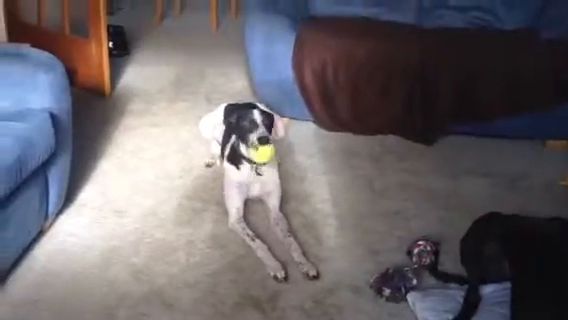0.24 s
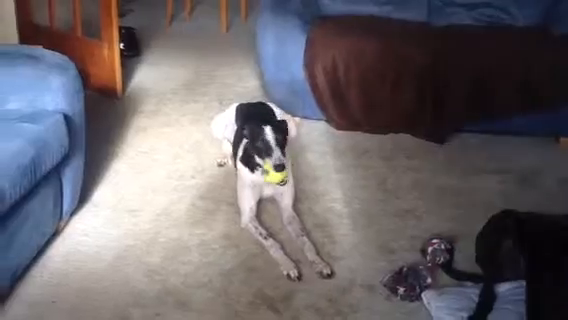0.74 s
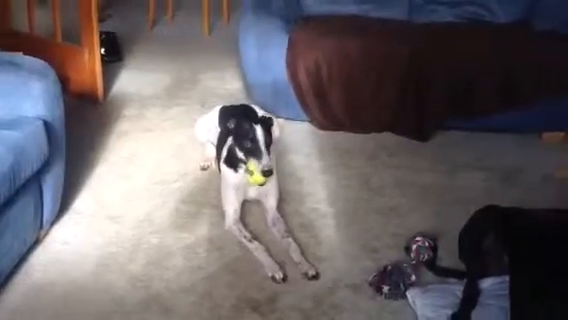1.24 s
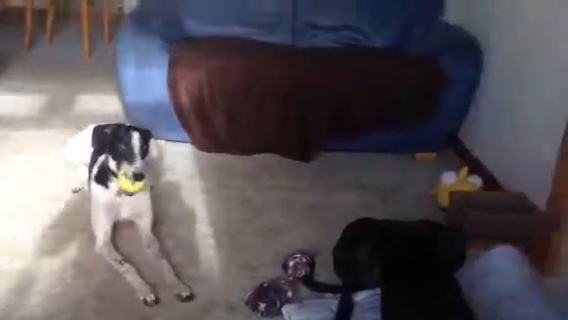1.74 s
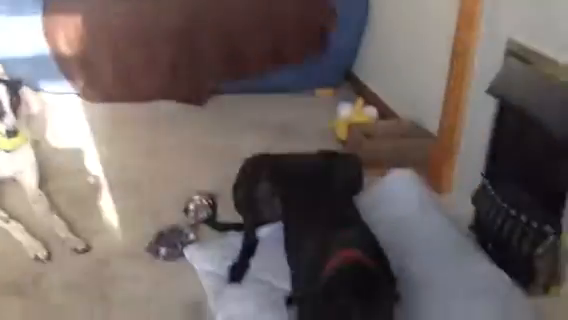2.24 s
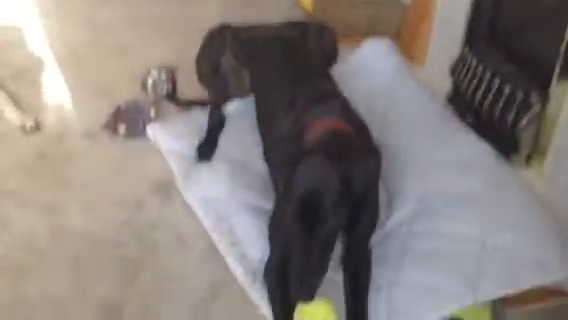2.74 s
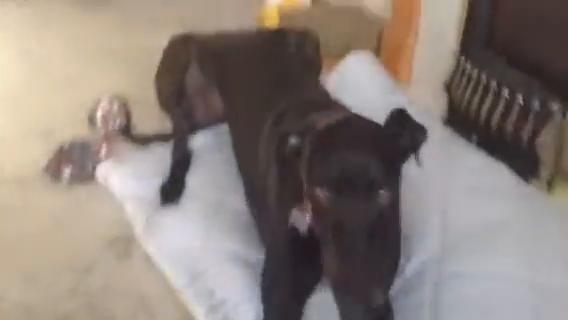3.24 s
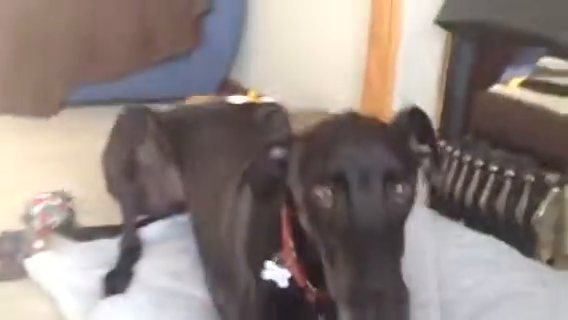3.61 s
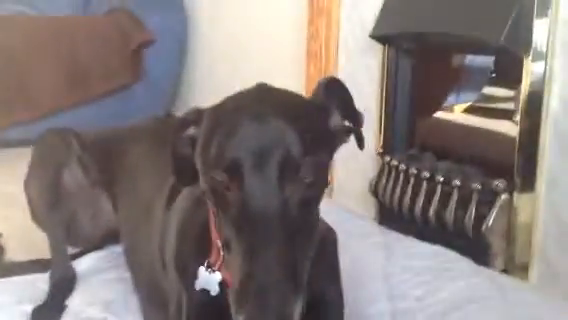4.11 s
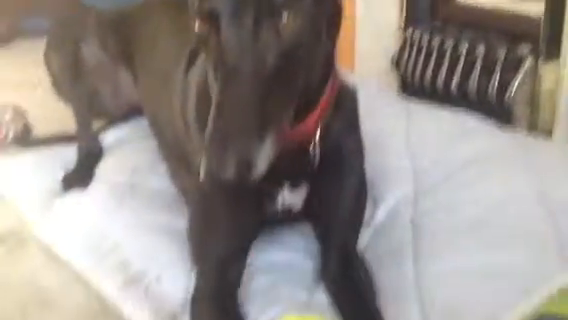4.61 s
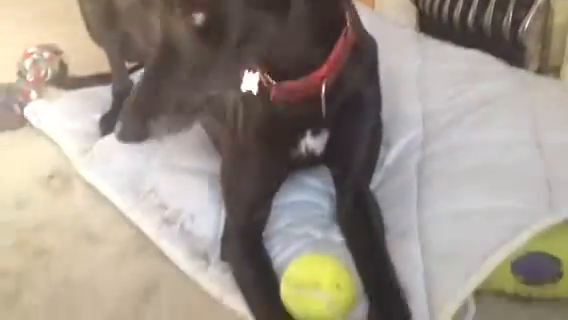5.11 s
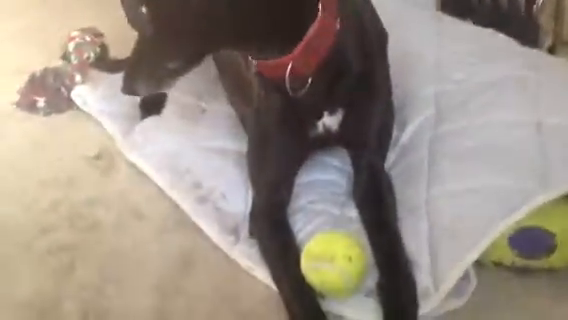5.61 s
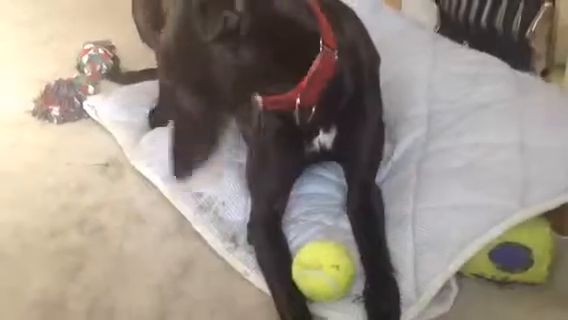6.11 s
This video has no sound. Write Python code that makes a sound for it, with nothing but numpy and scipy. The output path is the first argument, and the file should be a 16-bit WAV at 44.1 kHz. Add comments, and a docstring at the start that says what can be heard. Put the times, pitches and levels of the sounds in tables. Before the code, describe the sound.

A squeaky dog toy is heard a little way off with a short, soft indoor tail: a brief squeak, a strong bright one, a softer one, then after a gap a weak one, a longer one and a sharp final one. Much nearer, a hard bump lands before the middle, and a cluster of knocks and scuffs follows late, with small ticks and rustling over low hush. The microphone is small and thin in bass.

```python
"""A carpeted living room: a dog chews a squeaky ball. Its reed whistles as the jaws squeeze air out and again,
lower and sinking, as the ball refills: a stack of overtones weighed by pipe and mouth, plus air noise.
Short hisses lead into the squeezes, and a dense noise tail gives the room. Close to the microphone: damped
pulses for dry knocks, noise bursts for ticks and scuffs, grainy noise for cloth, one puff with a thin whistle.
Steady coloured noise is the soft hush behind."""
import sys
import numpy as np
from scipy import signal
from scipy.fft import rfft, irfft
from scipy.io import wavfile

SR = 44100
rng = np.random.default_rng(int(sys.argv[2]) if len(sys.argv) > 2 else 0)


def magnitude_from_level(level_db):
    """Linear magnitude for a level in decibels (20 dB per decade)."""
    exponent = np.asarray(level_db, float) / 20
    return 10 ** exponent


def pcm_store(signal):
    """Save signal as 16-bit PCM."""
    levels = np.round(np.clip(np.atleast_2d(signal), -1, 1) * 32767)
    wavfile.write(sys.argv[1], SR, levels.astype(np.int16).T)


N = 280035

# reed notes as the jaws squeeze air out, one list each: time_s, pitch_hz, level_db (before the mix)
SQUEEZES = [
    [(.393, 1532, -30.5), (.406, 1497, -26.5), (.418, 1467, -23), (.436, 1450, -27.5)],
    [(.995, 1456, -30.5), (1.02, 1472, -23.5), (1.052, 1574, -17), (1.057, 1697, -16.5), (1.08, 1727, -20),
     (1.1, 1799, -25.5), (1.134, 1774, -19)],
    [(1.944, 1564, -35), (1.951, 1560, -30.5), (1.97, 1786, -26.5), (1.99, 1784, -25.5),
     (2.005, 1818, -28.5), (2.03, 1834, -28.5), (2.052, 1657, -25)],
    [(3.518, 1573, -34), (3.535, 1610, -31), (3.546, 1647, -33.5), (3.553, 1491, -28), (3.595, 1467, -33.5)],
    [(4.754, 1476, -29), (4.788, 1488, -31), (4.794, 1633, -29), (4.81, 1754, -24.5), (4.83, 1809, -22.5),
     (4.89, 1757, -24.5), (4.937, 1827, -23)],
    [(6.19, 1563, -28), (6.205, 1553, -30.5), (6.24, 1791, -30.5), (6.255, 1811, -22.5),
     (6.268, 1767, -27.5), (6.274, 1886, -19.5), (6.288, 1891, -15.5), (6.294, 2156, -24),
     (6.314, 2096, -20.5), (6.334, 2100, -26)],
]
# reed notes as the ball draws air back in, one list each: time_s, pitch_hz, level_db (before the mix)
REFILLS = [
    [(-.14, 1600, -30), (-.04, 1340, -38)],
    [(.464, 1450, -33), (.484, 1456, -29.5), (.497, 1522, -25), (.51, 1479, -28), (.55, 1405, -39.5),
     (.575, 1289, -39)],
    [(1.145, 1475, -30.5), (1.16, 1567, -31.5), (1.19, 1653, -27.5), (1.205, 1647, -23),
     (1.24, 1635, -22.5), (1.275, 1545, -26.5), (1.34, 1443, -27.5), (1.365, 1365, -37), (1.39, 1350, -48)],
    [(2.066, 1493, -26), (2.078, 1646, -33), (2.09, 1671, -29.5), (2.12, 1651, -31), (2.14, 1565, -31),
     (2.2, 1418, -34.5), (2.245, 1350, -56)],
    [(3.608, 1496, -31), (3.617, 1624, -26.5), (3.628, 1607, -39), (3.645, 1542, -35), (3.665, 1476, -29.5),
     (3.69, 1446, -38), (3.72, 1367, -46.5), (3.74, 1387, -42)],
    [(4.958, 1515, -20), (4.99, 1595, -33.5), (5.015, 1587, -24.5), (5.065, 1525, -30), (5.12, 1545, -28),
     (5.132, 1659, -31.5), (5.15, 1611, -27), (5.19, 1450, -33), (5.245, 1391, -42.5)],
    [(6.33, 1478, -28), (6.37, 1420, -34.5)],
]
# overtone tilt at 1550 Hz, one per note: tilt_db_per_octave
SQUEEZE_TILT_DB_PER_OCTAVE = [4.5, 2.5, 0.5, 1.5, 4.5, 5.5]
REFILL_TILT_DB_PER_OCTAVE = [-5, -1.5, -1.5, -5, -2.5, -4.5, -2.5]
# lift of a band of overtones by the mouth round the ball, one per note: lift_db
SQUEEZE_MOUTH_DB = [4.2, 5, 2.3, 4, 11, 3.1]
REFILL_MOUTH_DB = [12, 11.5, 5.5, 13.5, 8, 9, 0.5]
# how long the reed catches sharp, one per squeeze: catch_s
CATCH_S = [.011, 0, 0, .005, .008, .005]
# hiss reached as each squeeze catches, one per squeeze: level_db (before the mix)
LEAK_DB = [-56.5, -56.5, -63, -65.5, -63, -67.5]
# overtone gain of the squeaker's pipe and the ball: freq_hz, gain_db
PIPE = [(1300, -9.5), (2000, -20), (2700, 6), (3300, 4.5), (4000, 1), (5200, -4), (7000, -8), (9500, -11),
        (12500, -17), (15500, -29)]
# decay time of the room: freq_hz, t60_s
ROOM_T60 = [(1000, 0.38), (3000, 0.27), (7000, 0.22), (14000, 0.2)]
# dull knocks near the microphone: start_s, peak_db, pulse_hz
KNOCKS = [(0.242, -38.5, 221), (0.394, -35, 284), (0.489, -39, 253), (1.752, -39.5, 417),
          (1.829, -36, 1136), (2.258, -32, 360), (2.451, -31, 883), (2.487, -41, 180), (2.682, -9.5, 980),
          (2.725, -24.5, 540), (2.972, -34.5, 200), (3.923, -33.5, 227), (4.236, -33.5, 221),
          (4.645, -40.5, 328), (4.893, -45, 327), (4.941, -40, 187), (5.131, -22, 407), (5.202, -23, 1080),
          (5.211, -21, 1020), (5.233, -29, 292), (5.332, -22, 557), (5.403, -24.5, 473),
          (5.575, -42.5, 200), (5.667, -23, 420), (5.82, -36, 227), (5.878, -14, 800), (6.005, -20, 560),
          (6.212, -12.5, 864)]
# bursts of rough rubbing: start_s, length_s, level_db, low_hz, high_hz
SCUFFS = [(0.415, 0.022, -51, 200, 2000), (0.622, 0.061, -60.5, 2480, 5470),
          (2.464, 0.01, -49.5, 600, 5770), (2.498, 0.016, -52.5, 300, 2460),
          (2.681, 0.014, -32.5, 1190, 8660), (2.877, 0.058, -59, 500, 6810),
          (2.948, 0.11, -53.5, 150, 4400), (3.147, 0.031, -58.5, 1000, 6840),
          (3.922, 0.013, -46.5, 300, 9000), (4.22, 0.056, -53, 298, 1470),
          (4.237, 0.0079, -43.5, 298, 9120), (4.483, 0.047, -63, 2020, 8880),
          (5.125, 0.092, -41.5, 150, 1093), (5.202, 0.018, -31, 198, 2060), (5.244, 0.029, -55, 200, 1800),
          (5.674, 0.085, -59, 200, 1815), (6.017, 0.042, -60.5, 297.3, 2170)]
# thin ticks: start_s, peak_db, centre_hz
TICKS = [(1.834, -42, 1900), (2.4535, -30.5, 2050), (2.8866, -35.5, 2350), (2.9022, -44, 4950),
         (3.1586, -51, 3990), (3.924, -31, 1750), (4.0013, -37.5, 9490), (4.031, -43.5, 3580),
         (4.093, -41, 4450), (4.2162, -52, 4400), (4.237, -33.5, 1970), (4.4, -44.5, 2140),
         (4.4785, -45.5, 3040), (4.585, -43.5, 2120), (4.7094, -40.5, 1760), (5.4886, -43, 2030),
         (5.5327, -48.5, 4270)]
# cloth and handling rustle: time_s, level_db
RUSTLE = [(0.0, -63.5), (1.06, -64), (1.55, -61), (2.1, -59), (2.55, -60), (2.8, -55.5), (2.95, -49.5),
          (3.08, -57.5), (3.87, -60), (4.62, -68.5), (5.13, -70), (5.31, -58.5), (5.5, -66.5),
          (5.84, -66.5), (6.35, -74.5)]
# relative power density of the cloth: freq_hz, density_db
CLOTH = [(59, -50), (100, -6.5), (202, -1), (301, -8.5), (383, -3.5), (583, -10.5), (1220, -10),
         (3400, -20), (12000, -33), (15600, -74.5), (22000, -120)]
# relative power density of the hush: freq_hz, density_db
HUSH = [(24, -49), (40, -30.5), (64, -28.5), (162, -1.5), (333, 3.5), (535, -11), (1020, -8.5),
        (2060, -35.5), (2920, -14.5), (3560, -19), (4240, -17.5), (13000, -24), (15500, -24.5)]

LEAD_S = 0.25   # the ball already sounds before the start


def rms_one(x):
    """Scales to rms 1."""
    return x / np.sqrt(np.mean(x ** 2) + 1e-20)


def at_hz(points, hz):
    """Reads a curve over log frequency."""
    point_hz, value = np.transpose(points)
    return np.interp(np.log(hz), np.log(point_hz), value)


def band(x, low_hz, high_hz, order=2):
    """Band-pass."""
    edges_hz = [low_hz, min(high_hz, 0.45 * SR)]
    return signal.sosfilt(signal.butter(order, edges_hz, "band", fs=SR, output="sos"), x)


def lowpass(x, hz, order):
    """Low-pass."""
    return signal.sosfilt(signal.butter(order, hz, fs=SR, output="sos"), x)


def drift(rate_hz):
    """Random wander of rms 1: white noise through two equal one-pole low-passes."""
    r = np.exp(-2 * np.pi * rate_hz / SR)
    settled = signal.lfilter([1], [1, -2 * r, r * r], rng.standard_normal(N + SR))[SR:]
    return rms_one(settled)


def coloured(white, spectrum):
    """Shapes noise to a spectrum; rms 1."""
    hz = np.maximum(np.fft.rfftfreq(N, 1 / SR), 1)
    return rms_one(irfft(rfft(white) * magnitude_from_level(at_hz(spectrum, hz)), N))


def faint(level_db, low_hz, high_hz, count=7):
    """Small events at chance moments, up to 5 dB below level_db: start_s, peak_db, freq_hz."""
    u = rng.random((count, 3))
    freq_hz = low_hz * (high_hz / low_hz) ** u[:, 2]
    return list(zip(u[:, 0] * N / SR, level_db - 5 * u[:, 1], freq_hz))


def mouth(partial_hz, lift_db, squeezed):
    """Overtone gain in dB: the mouth lifts a band, lower as the jaws close; a refill also has a dip."""
    centre_hz = 7970 if squeezed else 12100
    gain_db = lift_db * np.exp(-(np.log2(partial_hz / centre_hz) / 0.9) ** 2)
    if not squeezed:
        gain_db -= 15 * np.exp(-(np.log2(partial_hz / 8100) / 0.23) ** 2)
    return gain_db


def reed():
    """The reed chops air into sharp puffs: overtones weighed by pipe and mouth, air noise on each puff."""
    attack_s, release_s = 0.007, 0.0038
    catch_rise, catch_fade_s, catch_dulls_db_per_octave = 0.13, 0.0026, 8.8
    # as the jaws stop, pitch, level and tilt fall away
    collapse_hz, collapse_s, collapse_db, collapse_dulls_db_per_octave = 1238, 0.015, 5.5, 5
    # weak flow makes the pitch waver more
    waver_ratio, weak_waver_ratio_per_db, weak_below_db = 0.003, 0.0036, -39.5
    # alternate puffs differ for a moment
    doubling_start_s, doubling_length_s, undertone_db, doubling_depth = 1.17, 0.11, -32, 0.14

    lead = int(LEAD_S * SR)
    out = np.zeros(N + lead + SR)
    waver, flutter, shading, tilt_wander = drift(110), drift(42), drift(20), drift(25)
    air = rms_one(band(rng.standard_normal(N), 2700, 22000))
    k = np.arange(1, 13)[:, None]   # partial numbers
    notes = SQUEEZES + REFILLS
    tilts = SQUEEZE_TILT_DB_PER_OCTAVE + REFILL_TILT_DB_PER_OCTAVE
    lifts = SQUEEZE_MOUTH_DB + REFILL_MOUTH_DB
    for n, (note, note_tilt, lift_db) in enumerate(zip(notes, tilts, lifts)):
        squeezed = n < len(SQUEEZES)
        time_s, pitch_hz, level_db = np.transpose(note)
        start_s, end_s = time_s[0], time_s[-1]
        i = np.arange(int(start_s * SR), int(end_s * SR))
        t, on = i / SR, i % N
        base_hz, base_db = np.interp(t, time_s, pitch_hz), np.interp(t, time_s, level_db)

        # pitch
        catch_end_s = start_s + (CATCH_S[n] if squeezed else 0)
        fall = squeezed * np.clip(1 - (end_s - t) / collapse_s, 0, 1)
        hz = base_hz + fall * (collapse_hz - base_hz)
        hz *= 1 + catch_rise * np.clip((catch_end_s - t) / catch_fade_s, 0, 1)
        weak_db = np.maximum(weak_below_db - base_db, 0)
        hz *= 1 + waver[on] * (waver_ratio + weak_waver_ratio_per_db * weak_db)
        phase = 2 * np.pi * np.cumsum(hz) / SR

        # tilt in dB per octave: stronger flow is higher and brighter
        tilt = note_tilt + 7.8 * np.log2(base_hz / 1550) + 1.1 * tilt_wander[on]
        tilt -= collapse_dulls_db_per_octave * fall + catch_dulls_db_per_octave * (t < catch_end_s)

        # tilt pivots on the second partial; 0.6 of it also lifts the lowest
        partial_hz = k * hz
        tilt_octaves = np.log2(np.maximum(k / 2, 1)) + 0.6 * (k == 1)
        gain_db = at_hz(PIPE, partial_hz) + mouth(partial_hz, lift_db, squeezed) + tilt * tilt_octaves
        weight = magnitude_from_level(gain_db) * (partial_hz < 0.45 * SR)
        # lips and teeth shade each overtone in its own way as the jaws move
        shade = magnitude_from_level(2.5 * shading[(on + 9001 * k) % N])
        tone = np.sum(weight * shade * np.cos(k * phase + 0.3 * k ** 2), axis=0)
        tone /= np.sqrt(np.sum(weight ** 2, axis=0) / 2)
        tone += magnitude_from_level(-30 + 0.5 * tilt) * air[on] * (1 + np.cos(phase))

        doubling = np.sin(np.pi * np.clip((t - doubling_start_s) / doubling_length_s, 0, 1))
        undertone = doubling * np.cos(phase / 2)
        tone = tone * (1 + doubling_depth * undertone) + magnitude_from_level(undertone_db) * undertone

        swell = np.clip(np.minimum((t - start_s) / attack_s, (end_s - t) / release_s), 0, 1) ** 2
        out[i + lead] += tone * swell * magnitude_from_level(base_db - collapse_db * fall + 1.5 * flutter[on])
    return out[:N + lead]


def leak(rise_db_per_s=130, length_s=0.12):
    """The bite builds pressure and air hisses out until the reed starts."""
    t = np.arange(N + int(LEAD_S * SR)) / SR - LEAD_S
    before_s = np.array([note[0][0] for note in SQUEEZES])[:, None] - t
    level = magnitude_from_level(np.array(LEAK_DB)[:, None] - rise_db_per_s * np.abs(before_s))
    level *= (before_s > 0) * (before_s < length_s)
    return level.sum(axis=0) * rms_one(band(rng.standard_normal(len(t)), 7000, 13000))


def room(x):
    """Dense carpeted-room response: noise that dies band by band after a short gap."""
    t = np.arange(SR // 2) / SR
    edges_hz = 700 * 2 ** np.arange(0, 5, 0.5)
    white = rng.standard_normal((2, len(t)))
    tail = np.zeros(len(t))
    for k, (low_hz, high_hz) in enumerate(zip(edges_hz, edges_hz[1:])):
        t60_s = at_hz(ROOM_T60, np.sqrt(low_hz * high_hz))
        tail += band(white[k % 2], low_hz, high_hz) * magnitude_from_level(-60 * t / t60_s)
    tail *= np.clip((t - 0.003) / 0.0013, 0, 1)
    return signal.fftconvolve(x, tail / np.sqrt(np.sum(tail ** 2)))[:len(x)]


def knocks(rise_cycles=0.11, damping_per_cycle=2.25, phase_rad=0.29, rattle_db=-21, rattle_s=0.0044):
    """A sudden push on the case swings back once and dies in a short rattle."""
    out, t = np.zeros(N + SR), np.arange(SR // 20) / SR
    rows = faint(-53.5, 190, 360) + KNOCKS
    noise = band(rng.standard_normal((len(rows), len(t))), 400, 1500)
    rattle_shape = magnitude_from_level(rattle_db) * t / rattle_s * np.exp(-t / rattle_s)
    for (start_s, peak_db, hz), grain in zip(rows, noise):
        pulse = np.sin(2 * np.pi * hz * t + phase_rad) * np.exp(-damping_per_cycle * hz * t)
        pulse *= (1 - np.exp(-hz * t / rise_cycles)) ** 2
        rattle = rattle_shape * rms_one(grain)
        start = int(start_s * SR)
        out[start:start + len(t)] += magnitude_from_level(peak_db) * (pulse / np.max(np.abs(pulse)) + rattle)
    return out[:N]


def scuffs(grain_db=5.0):
    """Rubbing catches and slips: grainy noise, duller toward the top, that starts fast and fades."""
    out, grains = np.zeros(N), rng.standard_normal(N) * magnitude_from_level(grain_db * drift(330))
    for start_s, length_s, level_db, low_hz, high_hz in SCUFFS:
        on = slice(int(start_s * SR), int((start_s + 2.3 * length_s) * SR))
        u = np.arange(on.stop - on.start) / SR / length_s
        shape = np.minimum(u / 0.055, 1) * np.exp(-2.2 * u ** 3)
        rub = band(grains[on], low_hz, high_hz, order=1)
        rub = lowpass(rub, min(0.5 * high_hz, 0.45 * SR), order=1)
        out[on] += magnitude_from_level(level_db) * shape * rms_one(rub)
    return out


def ticks(spread=1.6, decay_s=0.0023):
    """A tick is a few milliseconds of noise around its own pitch."""
    out, t = np.zeros(N + SR), np.arange(SR // 40) / SR
    rows = faint(-61, 2900, 4700) + TICKS
    noise = rng.standard_normal((len(rows), len(t)))
    for (start_s, peak_db, hz), white in zip(rows, noise):
        grain = band(white * np.exp(-t / decay_s), hz / spread, hz * spread)
        start = int(start_s * SR)
        out[start:start + len(t)] += magnitude_from_level(peak_db) * grain / np.max(np.abs(grain))
    return out[:N]


def rustle(grain_db=-1.0, lump_db=2.5):
    """Cloth rubs in uneven grains; harder rubbing is brighter."""
    time_s, row_db = np.transpose(RUSTLE)
    level_db = np.interp(np.arange(N) / SR, time_s, row_db)
    grains = rng.standard_normal(N) * magnitude_from_level(grain_db * drift(300) + lump_db * drift(32))
    cloth = coloured(grains, CLOTH)
    low = lowpass(cloth, 1500, order=2)
    treble_db = -2 + 0.1 * (level_db + 61)
    return magnitude_from_level(level_db) * (low + magnitude_from_level(treble_db) * (cloth - low))


def puff(peak_s=5.92, half_s=0.22, fall_db_per_s=44, hiss_db=-62, whistle_db=-80):
    """Hiss with a soft ridge near 5.6 kHz and a thin whistle on top, swelling to a peak and back."""
    away_s = np.abs(np.arange(N) / SR - peak_s)
    swell = magnitude_from_level(-fall_db_per_s * away_s) * np.clip((half_s - away_s) / 0.04, 0, 1)
    whistle_hz = 14250 - 5000 * np.minimum(away_s, half_s)   # highest at the peak
    whistle = np.sin(2 * np.pi * np.cumsum(whistle_hz) / SR)
    white = rng.standard_normal(N)
    hiss = rms_one(band(white, 2200, 6800)) + 0.2 * rms_one(band(white, 5600, 5620))
    return swell * (magnitude_from_level(hiss_db) * hiss + magnitude_from_level(whistle_db) * whistle)


def hush(level_db=-61.5):
    """Steady coloured noise of the room."""
    return magnitude_from_level(level_db) * coloured(rng.standard_normal(N), HUSH)


def scene():
    """The ball, direct and through the room, the handling close by, and the hush."""
    ball = reed() + leak()
    heard = magnitude_from_level(-3) * ball + magnitude_from_level(-4.5) * room(ball)
    near = knocks() + scuffs() + ticks() + rustle() + puff()
    return (heard[-N:] + near + hush())[None]   # the lead is cut off


def band_limit(x):
    """A steep low-pass at the top of the band."""
    return signal.sosfilt(signal.butter(12, 15830, fs=SR, output="sos"), x)


def record(dry):
    """A small microphone with a steep bass cut."""
    cut = signal.sosfilt(signal.butter(3, 140, "high", fs=SR, output="sos"), dry)
    return band_limit(cut)


dry = scene()
out = record(dry)
pcm_store(out)
```